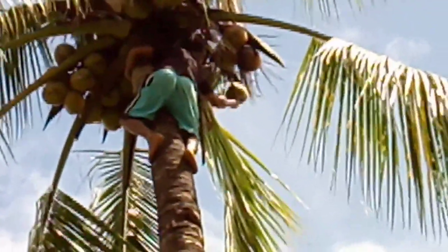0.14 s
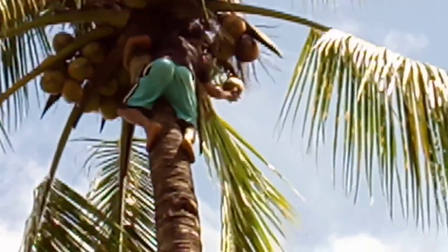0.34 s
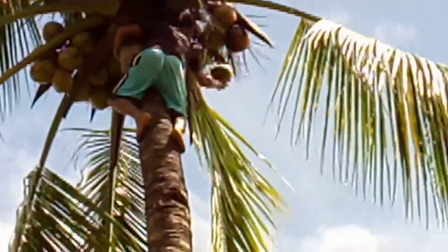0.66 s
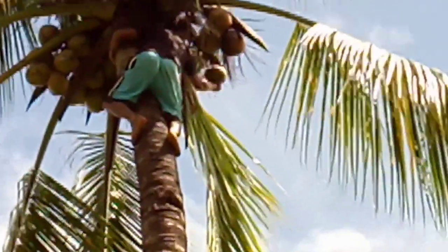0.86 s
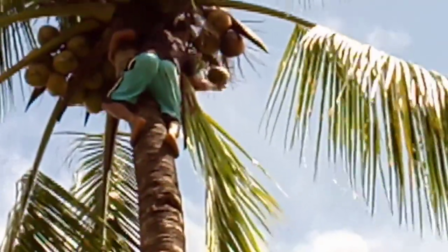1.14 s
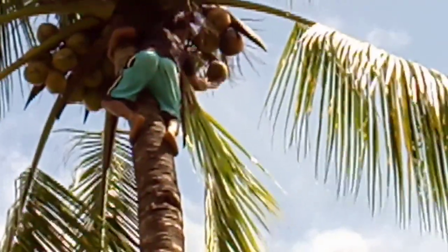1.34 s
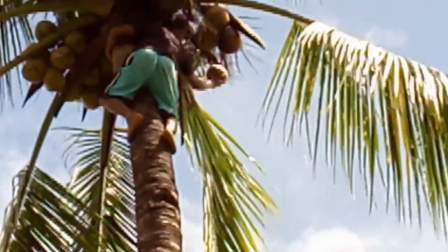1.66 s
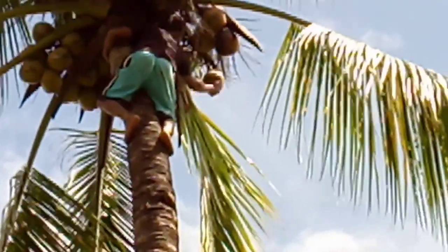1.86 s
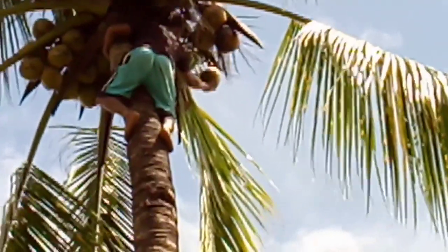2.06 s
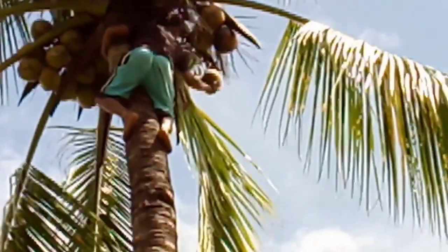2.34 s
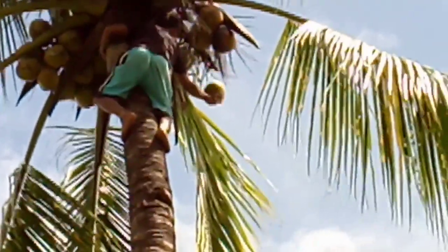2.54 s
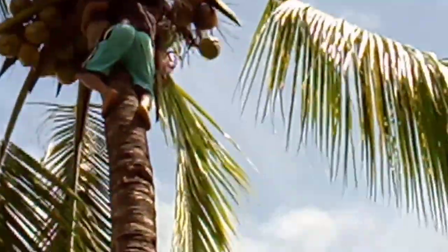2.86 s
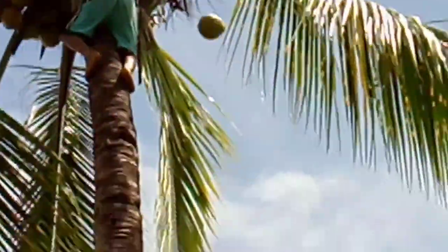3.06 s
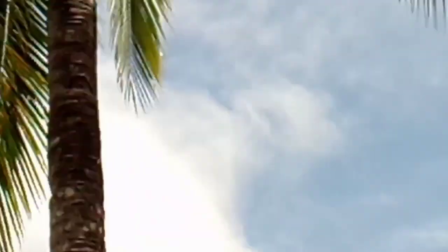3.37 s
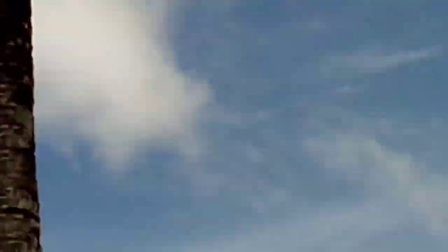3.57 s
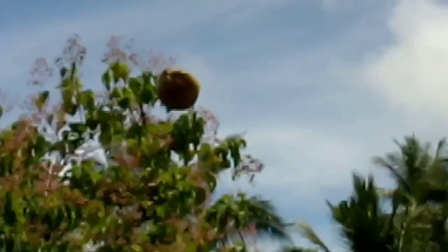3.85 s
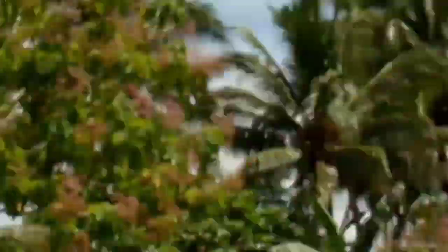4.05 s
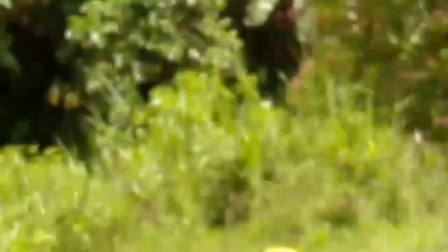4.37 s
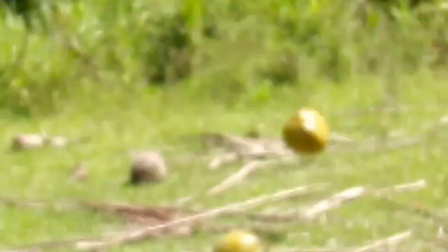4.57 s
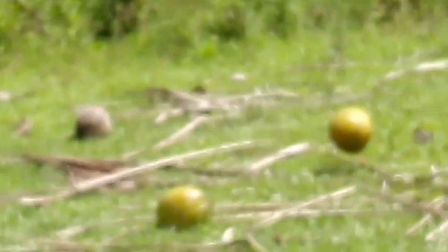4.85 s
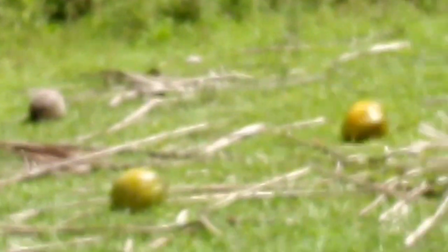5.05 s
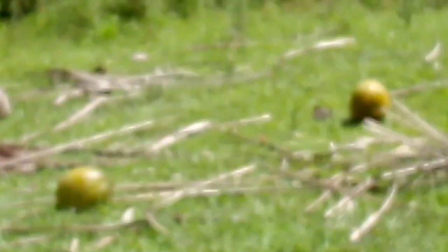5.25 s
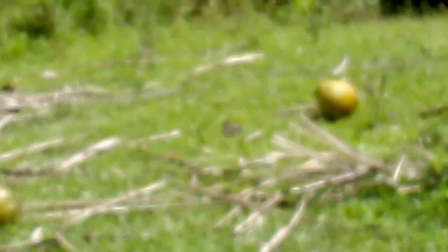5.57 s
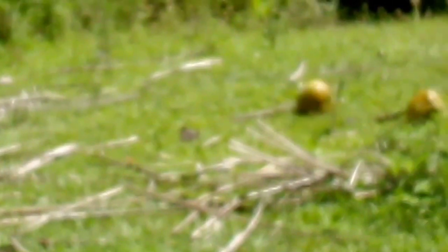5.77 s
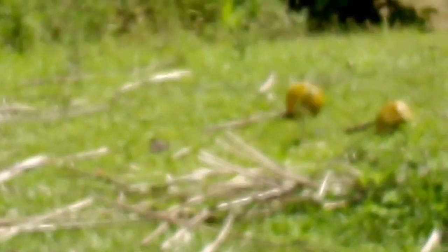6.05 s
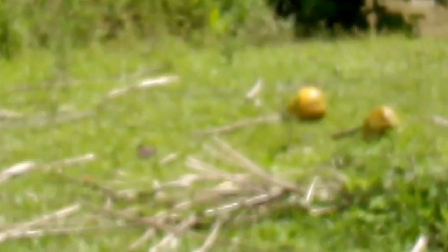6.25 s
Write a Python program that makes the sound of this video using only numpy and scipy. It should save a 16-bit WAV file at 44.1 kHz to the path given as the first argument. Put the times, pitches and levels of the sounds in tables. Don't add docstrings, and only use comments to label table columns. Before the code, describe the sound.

Coconuts thud hard onto grassy soil with sharp cracks and leaf crackle, amid insects, bird chirps, a distant chugging engine and wind buffeting.

```python
import sys
import numpy as np
from scipy import signal
from scipy.fft import rfft, irfft
from scipy.io import wavfile
from scipy.ndimage import uniform_filter1d

SR = 44100
rng = np.random.default_rng(int(sys.argv[2]) if len(sys.argv) > 2 else 0)


def to_wav(s):
    ch = np.atleast_2d(s).T
    pcm = np.round(np.clip(ch, -1, 1) * 32767)
    wavfile.write(sys.argv[1], SR, pcm.astype(np.int16))


def rack_gain(trim_db):
    fader = np.asarray(trim_db, float)
    return 10 ** (fader / 20)


N = 282666
T = np.arange(N) / SR


def unit(x):
    return x / np.sqrt(np.mean(x ** 2))


def noise():
    return rng.standard_normal(N)


def colour(x, points):
    hz, db = np.transpose(points)
    bins = np.arange(2049) * SR / 4096
    log_gain = np.interp(np.log(bins + 1), np.log(hz), db) * np.log(10) / 20
    cepstrum = irfft(log_gain)
    cepstrum[1:2048] *= 2
    cepstrum[2049:] = 0
    response = irfft(np.exp(rfft(cepstrum)))
    return signal.fftconvolve(x, response)[:len(x)]


def resonate(x, hz, width):
    return signal.lfilter(*signal.iirpeak(hz, hz / width, SR), x)


def walk(rate):
    hold = int(SR / rate)
    steps = np.repeat(rng.standard_normal(N // 100), hold)[:N]
    return unit(uniform_filter1d(uniform_filter1d(steps, hold), hold))


def curve(table, column):
    rows = np.transpose(table)
    return np.interp(T, rows[0], rows[column])


def add(out, s, sound):
    i = int(s * SR)
    out[i:i + len(sound)] += sound[:N - i]


def bursts(rows, attack_s):
    power = 0
    for s, db, hold, t60 in rows:
        attack = np.clip((T - s) / attack_s, 0, 1)
        fade = 1000. ** (-np.clip(T - s - attack_s - hold, 0, 9) / t60)
        power = power + (rack_gain(db) * attack * fade) ** 2
    return np.sqrt(power)


def tail(t60, rise_s):
    t = T[:SR // 2]
    scatter = rng.standard_normal(len(t)) * 1000. ** (-t / t60) * (1 - np.exp(-t / rise_s))
    return scatter / np.sqrt(np.sum(scatter ** 2))


def air():
    # (frequency [Hz], level [dB per Hz])
    hiss_colour = [(150, -16.5), (250, -0.5), (446, -9.5), (531, -10), (981, -13), (3290, -14),
                   (5370, -14.5), (5760, -16.5), (6870, -29.5), (8630, -24), (10300, -50), (15100, -38.5),
                   (16500, -37.5)]
    return unit(colour(noise(), hiss_colour)) * rack_gain(-71 + 1.5 * walk(2.49))


def whistle(out, s, length, hz0, hz1, db, flutter):
    octave_db = -24.5
    t, i = T[:int(length * SR)], int(max(s, 0) * SR)
    swell = np.sin(np.pi * t / length) ** .5 * (1 + flutter[i:i + len(t)])
    phase = 2 * np.pi * t * (hz0 + (hz1 - hz0) * t / length / 2)
    add(out, i / SR, rack_gain(db) * swell * (np.sin(phase) + rack_gain(octave_db) * np.sin(2 * phase)))


def chorus():
    # (time [s], level
    # [dB], centre [Hz])
    chorus_path = [(0.0, -68, 5210), (0.3, -67.5, 5180), (0.65, -65, 4810), (1.0, -67.5, 4940),
                   (1.35, -60, 5080), (1.6, -64.5, 5065), (2.0, -67.5, 5370), (2.5, -69, 5220),
                   (2.75, -67, 4640), (3.25, -68.5, 5300), (4.1, -70, 4600), (4.5, -69.5, 5110),
                   (4.77, -58, 5140), (4.93, -67, 4540), (5.2, -65.5, 5200), (5.7, -64.5, 5000),
                   (5.98, -61.5, 4290), (6.3, -65, 5180)]
    # (frequency [Hz], level [dB])
    band_colour = [(3000, -27.5), (3600, -14.5), (4000, -9.5), (5000, -2.5), (5750, -2), (6100, -16.5),
                   (6600, -27.5)]
    # (frequency [Hz], width [Hz], level [dB])
    thin_voices = [(8450, 160, -90), (8900, 250, -88), (9400, 290, -95), (11220, 200, -91),
                   (13000, 505, -99), (523, 12, -83), (604, 33, -86)]
    # (time [s], length [s], start pitch [Hz], end pitch [Hz], level [dB])
    single_whistles = [(0.0, 0.26, 2320, 2090, -81.5), (0.031, 0.05, 5080, 5040, -64.5),
                       (0.387, 0.12, 1612, 1730, -81), (0.81, 0.033, 2565, 2890, -68),
                       (1.133, 0.065, 4200, 4880, -69), (2.602, 0.2, 4000, 4600, -79),
                       (4.08, 0.044, 2990, 3050, -82), (4.13, .08, 4300, 4050, -73),
                       (4.205, .05, 3800, 5700, -62), (4.245, .07, 5500, 6500, -74),
                       (2.75, .25, 4600, 4500, -77), (4.26, 0.072, 5200, 4700, -73),
                       (3.01, 0.15, 4390, 3600, -74.5), (3.612, .06, 4340, 3780, -72.5),
                       (3.80, 0.083, 3720, 3800, -83), (3.98, 0.066, 3900, 3400, -82),
                       (1.524, 0.052, 1470, 1390, -81), (0.824, 0.064, 3660, 3700, -78),
                       (4.868, .12, 4100, 3330, -77), (4.881, 0.11, 2290, 2110, -83),
                       (5.03, 0.12, 2700, 2650, -80), (5.04, 0.11, 3100, 3350, -83),
                       (6.06, 0.083, 2720, 2970, -79), (6.331, 0.076, 3270, 3210, -80)]
    notes_per_s, note_s, pitch_spread, notes_db = 48, 0.0602, .16, -4
    low_share, low_db = .25, -10
    note_rough, single_rough = 0.67, 1.3
    grove_t60_s, grove_db = 0.19, 4.5

    centre, notes, single = curve(chorus_path, 2), np.zeros(N), np.zeros(N)
    flutter = np.tile(walk(400), 2)
    draws = rng.random((1500, 7))[:int(notes_per_s * N / SR)]
    for when, a, b, glide, size, length, kind in draws:
        hz = min(centre[int(when * N)] * (1 + pitch_spread * (a + b - 1)), 5900)
        db = 7 * size
        if kind < low_share:
            hz = hz * (.5 + .3 * a)
            db = db + low_db
        end_hz = hz * (1 + 0.071 * (glide - .5))
        whistle(notes, when * N / SR, note_s * (0.34 + 1.4 * length), hz, end_hz, db, note_rough * flutter)

    for row in single_whistles:
        whistle(single, *row, single_rough * flutter)
    smear = signal.fftconvolve(single, tail(grove_t60_s, 0.0026))[:N]
    single = single + rack_gain(grove_db) * smear

    blur = unit(colour(noise(), band_colour)) * rack_gain(walk(15))
    thin = np.zeros(N)
    for hz, width, db in thin_voices:
        thin += rack_gain(db + 3.9 * walk(35)) * unit(resonate(noise(), hz, width))
    return rack_gain(curve(chorus_path, 1)) * (blur + rack_gain(notes_db) * unit(notes)) + single + thin


def engine():
    # (time [s], level [dB])
    engine_level = [(0.0, -60.5), (0.55, -65), (0.75, -54), (1.03, -60), (1.25, -54), (1.8, -57),
                    (2.2, -58), (2.7, -60), (3.28, -57.5), (3.86, -57.5), (4.18, -53), (4.55, -58),
                    (4.8, -53.5), (5.4, -59.5), (5.6, -54.5), (6.3, -56)]
    # (frequency [Hz], width [Hz], level [dB])
    exhaust_rings = [(119.4, 49.5, 3.5), (150.5, 46, -1.5), (198, 180, -19.5), (511, 60, -28)]
    firings_per_s, one_firing_s = 20.0, 4.122
    scatter_db, jitter_turns, pop_s, blur_db = 2, 0.033, .002, -8
    casing_hz, casing_width_hz, casing_db, casing_wander_db = 306, 96, -19, 4

    turns = firings_per_s * (T - one_firing_s) + jitter_turns * walk(13)
    firing = np.flatnonzero(np.diff(np.floor(turns)) > 0)
    pops = np.zeros(N)
    pops[firing] = rack_gain(scatter_db * rng.standard_normal(400)[:len(firing)])
    pop_length = int(pop_s * SR)
    drive = uniform_filter1d(unit(pops) + rack_gain(blur_db) * noise(), pop_length)

    pipe = np.zeros(N)
    for hz, width, db in exhaust_rings:
        pipe += rack_gain(db) * resonate(resonate(drive, hz, width), hz, width)
    casing = drive + 1.55 * np.std(drive) * unit(uniform_filter1d(noise(), pop_length))
    casing = resonate(casing, casing_hz, casing_width_hz)
    casing = resonate(casing, casing_hz, casing_width_hz)
    level = curve(engine_level, 1)
    casing_level = level + casing_db + casing_wander_db * walk(3.815)
    return unit(pipe) * rack_gain(level + 1.0) + unit(casing) * rack_gain(casing_level)


def even(x):
    return unit(x / np.sqrt(uniform_filter1d(x ** 2, int(.035 * SR)) + .05))


def gusts():
    # (time [s], peak level [dB], length [s], flutter over peak level [dB])
    gust_list = [(0.05, -62.5, 0.17, -5.5), (0.58, -58, 0.23, -8), (0.71, -45, 0.05, -6),
                 (1.028, -60.5, 0.2, 0.5), (1.24, -51.5, 0.09, -22), (1.416, -56.5, 0.062, -2.5),
                 (1.564, -56.5, 0.12, -4), (1.858, -59.5, 0.12, 2), (2.12, -61.5, 0.12, -13),
                 (2.357, -62, 0.14, -4), (2.634, -68.5, 0.14, 3), (3.213, -46.5, 0.049, -19),
                 (3.332, -51, 0.13, -14), (3.798, -50, 0.067, -11), (3.878, -54, 0.047, -14),
                 (4.146, -69.5, 0.61, 0.5), (4.616, -52, 0.087, -9), (4.87, -59, 0.2, -1),
                 (5.165, -54.5, 0.17, -7), (5.427, -35.5, 0.049, -22), (5.595, -42, 0.092, -7.5),
                 (5.805, -45, 0.082, -5), (5.988, -51, 0.13, -8), (6.281, -43.5, 0.15, -12.5)]
    lull_db, rise_share, fall_db = -75.5, 0.77, 14.5
    eddy = flutter = rack_gain(lull_db) ** 2
    for s, db, length, flutter_db in gust_list:
        away = np.where(T < s, (s - T) / rise_share, T - s) / length
        power = rack_gain(db - fall_db * away ** 0.88) ** 2
        eddy = eddy + power
        flutter = flutter + power * rack_gain(flutter_db) ** 2
    return np.sqrt(eddy), np.sqrt(flutter)


def wind():
    # (frequency [Hz], level [dB per Hz])
    eddy_colour = [(20, -43.5), (40, -12), (70, 1.5), (100, -1), (140, -8), (250, -24.5), (400, -61.5),
                   (800, -70), (2500, -120)]
    # (frequency [Hz], level [dB per Hz])
    flutter_colour = [(60, -32.5), (110, 2), (160, 4), (250, -16), (350, -24.5), (600, -57.5), (2500, -120)]
    low = even(unit(colour(noise(), eddy_colour)))
    high = even(unit(colour(noise(), flutter_colour)))
    eddy, flutter = gusts()
    buffet = rack_gain(5 + 2 * walk(30))
    return (low * eddy + high * flutter) * buffet


def leaves():
    # (time [s], leaf level [dB], stalk level [dB], hold [s], t60 [s])
    crush_list = [(0.659, -46, -35.5, .003, 0.085), (0.686, -55, -44.5, 0.031, .28),
                  (0.911, -72.5, -74, 0.0043, 0.077), (1.112, -73.5, -92, 0.012, 0.089),
                  (1.245, -58, -59, 0.011, .1), (1.26, -49.5, -52.5, 0.043, 0.23),
                  (1.34, -60, -66.5, 0.022, 0.11), (1.4, -65, -71.5, 0.018, 0.16),
                  (1.54, -73, -75, 0.021, 0.22), (4.167, -87, -78.5, 0.075, 0.5),
                  (4.378, -75, -80, 0.011, .1), (4.393, -69, -73, 0.018, 0.17),
                  (4.647, -67, -72, 0.016, .2), (4.698, -61.5, -64.5, 0.017, 0.61),
                  (4.864, -69, -49, 0.002, 0.034), (5.001, -76, -77, 0.047, .4),
                  (5.969, -73, -68.5, 0.075, .1), (6.03, -72, -63.5, 0.019, .03),
                  (6.14, -83, -79, .01, 0.27)]
    # (frequency [Hz], level [dB per Hz])
    leaf_colour = [(1470, -38), (2500, -8), (3520, -16), (4340, -1.5), (5150, -1.5), (6600, -7),
                   (7830, -25), (9220, -17.5), (11500, -27), (16000, -31)]
    # (frequency [Hz], level [dB per Hz])
    stalk_colour = [(300, -10), (500, -14.5), (900, -3.5), (1600, -2.5), (2600, -6.5), (3600, -3.5),
                    (6000, -50)]
    snaps_per_s, scatter_db, attack_s = 2800, 3, 0.0028

    chance = rng.random((2, N))
    snaps = (chance[0] < snaps_per_s / SR) * rack_gain(-scatter_db * np.log(chance[1]))
    puffs = unit(signal.fftconvolve(snaps, np.exp(-T[:200] / 0.0011))[:N])
    crackle = (puffs + .4) * noise()

    leaf_level = bursts([(s, db, hold, t60) for s, db, _, hold, t60 in crush_list], attack_s)
    stalk_level = bursts([(s, db, hold, t60) for s, _, db, hold, t60 in crush_list], attack_s)
    bright = rack_gain(10.5) * leaf_level * unit(colour(crackle, leaf_colour))
    dull = rack_gain(1.0) * stalk_level * unit(colour(np.roll(crackle, SR), stalk_colour))
    return bright + dull * rack_gain(2.3 * walk(60))


def cracks():
    # (time [s], peak level [dB], ring [Hz], t60 [s])
    knock_list = [(0.6605, -12.5, 2970, 0.017), (0.6621, -9, 2970, 0.0076), (0.6612, -18.5, 1030, 0.025),
                  (0.6615, -16, 800, 0.025), (1.2500, -34.5, 865, 0.03), (4.4000, -57.5, 1510, 0.037),
                  (4.6410, -26, 1310, 0.014), (4.6425, -28, 497, 0.014), (4.7040, -49.5, 1410, 0.047),
                  (5.9590, -45, 1760, 0.022), (6.0440, -52, 2250, 0.048), (6.0470, -54, 1330, 0.036),
                  (6.1350, -57.5, 1570, .05)]
    # (time [s], peak level [dB], ring [Hz], t60 [s])
    snap_list = [(0.6604, -23, 5320, .01), (0.6610, -25, 8030, 0.0068), (0.6695, -32, 5520, 0.035),
                 (1.2692, -27, 5730, 0.038), (1.3018, -22, 5160, 0.01), (1.3268, -20.5, 4400, 0.0093),
                 (1.3292, -27.5, 4220, 0.012), (1.3470, -38, 5000, .015), (1.4240, -46, 5000, .01),
                 (4.7030, -32, 5420, 0.016), (4.7105, -34, 3960, 0.019), (4.8675, -32.5, 3730, 0.0034),
                 (5.0210, -38.5, 5020, 0.023), (5.0320, -40, 4570, 0.018)]
    # (time [s], peak level [dB], ring [Hz], t60 [s])
    near_list = [
        (4.6294, -38, 2000, .004),
        (4.6337, -19, 2500, .004),
        (4.6396, -25, 2600, .012),
        (4.6412, -11, 5000, .0025),
        (4.6418, -27, 3300, .007),
    ]
    # (frequency [Hz], level [dB per Hz])
    crack_colour = [(350, 21), (600, -4.5), (1660, -12), (2370, -16), (3040, -11), (3940, -4), (6550, -7),
                    (8740, -26), (9620, -13.5), (16000, -50)]
    # (its cracks, noisy share 0-1, sizzle dB)
    kinds = ((knock_list, 0.21, 0), (snap_list, 0.32, 5.8), (near_list, 0.45, 14))

    splinters, ring, t = np.zeros(N), np.zeros(N), T[:SR // 10]
    splinter = unit(colour(noise(), [(150, -80)] + crack_colour[1:]))
    sizzle = signal.sosfilt(signal.butter(4, 13000, "high", fs=SR, output="sos"), noise())
    for rows, share, sizzle_db in kinds:
        for s, peak_db, hz, t60 in rows:
            cut = slice(int(s * SR), int(s * SR) + len(t))
            shape = rack_gain(peak_db) * 1000. ** (-t / t60) * (1 - np.exp(-t / 0.000128))
            rough = splinter[cut] + rack_gain(sizzle_db - 12.5) * sizzle[cut]
            add(splinters, s, shape * share * 0.89 * rough)
            add(ring, s, shape * (1 - share) * np.sin(2 * np.pi * hz * t))
    return splinters, ring


def thumps():
    # (time [s], ring level [dB], ring [Hz], contact [ms], direct push level [dB])
    blows = [
        (0.6632, -11, 100, 2.6, -18),
        (1.2605, -33, 108, 2.0, -50),
        (1.2707, -30, 108, 2.0, -50),
        (4.6453, -31, 88, 2.0, -44),
        (4.8675, -38, 92, .7, -26),
    ]
    sag, sag_s, soil_t60_s = .5, .012, 0.072
    out, t = np.zeros(N), T[:SR // 4]
    for s, ring_db, hz, contact_ms, push_db in blows:
        push = np.sin(np.pi * np.clip(1000 * t / contact_ms, 0, 1)) ** .5
        phase = 2 * np.pi * hz * (t + sag * sag_s * (1 - np.exp(-t / sag_s)))
        ring = np.sin(phase) * 1000. ** (-t / soil_t60_s) * (1 - np.exp(-t / .0007))
        sign = -1 if push_db > ring_db else 1
        add(out, s, rack_gain(push_db) * push + sign * rack_gain(ring_db) * ring)
    return out


def bird():
    # (time [s], level [dB], pitch [Hz], t60 [s])
    song = [
        (2.155, -63.5, 3920, 0.66),
        (5.275, -57, 3870, 0.23),
        (5.845, -42, 3990, .27),
    ]
    # (multiple of the pitch [1], level [dB])
    overtone_list = [(2, -23), (3, -29), (4, -30)]
    attack_s, hold_s, sag_hz_per_s = .012, .012, 300
    trills_per_s, trill_depth, trill_peak_s, trill_fade_s = 95, .8, 5.859, .022

    hz = np.full(N, 1. * song[0][2])
    for s, db, start_hz, t60 in song:
        hz = np.where(T >= s, start_hz - sag_hz_per_s * np.minimum(T - s, .2), hz)
    phase = 2 * np.pi * np.cumsum(hz * (1 + .008 * walk(150))) / SR
    effort = bursts([(s, db, hold_s, t60) for s, db, _, t60 in song], attack_s)
    overtones = sum(rack_gain(db) * np.sin(order * phase) for order, db in overtone_list)
    tone = np.sin(phase) + (effort / effort.max()) ** .2 * overtones
    trill_swell = trill_depth * np.exp(-np.abs(T - trill_peak_s - .005) / trill_fade_s)
    trill = 1 + trill_swell * np.cos(2 * np.pi * trills_per_s * (T - trill_peak_s))
    return tone * effort * trill * rack_gain(2.5 * walk(110))


def scene():
    surroundings = air() + chorus() + engine() + wind()
    crushed = leaves()
    splinters, husk = cracks()
    blow = thumps() + splinters
    scatter = colour(tail(0.53, .015), [(100, -12), (600, 0), (5000, 0), (16000, -14)])
    echo = rack_gain(-23) * signal.fftconvolve(blow, scatter)[:N]
    return (surroundings + crushed + blow + husk + echo + bird())[None]


def band_limit(x):
    return signal.sosfilt(signal.butter(12, 16980, fs=SR, output="sos"), x)


def record(dry):
    low_cut = signal.butter(3, 58, "high", fs=SR, output="sos")
    top_cut = signal.ellip(6, .5, 50, 15900, fs=SR, output="sos")
    mix = signal.sosfilt(np.vstack([low_cut, top_cut]), dry)
    return band_limit(mix)


dry = scene()
out = record(dry)
to_wav(out)
```